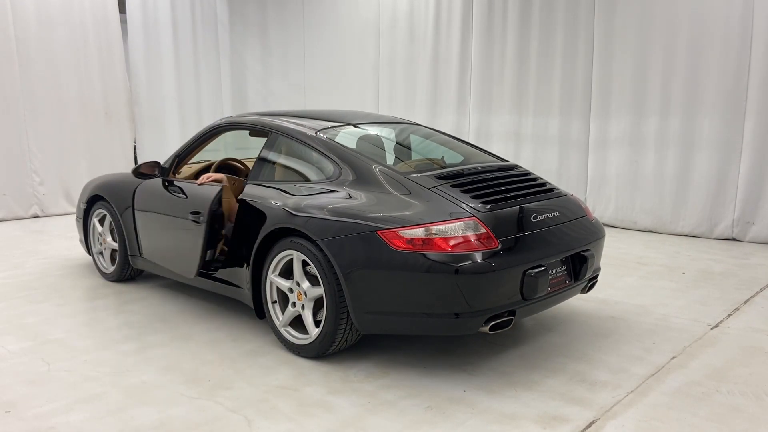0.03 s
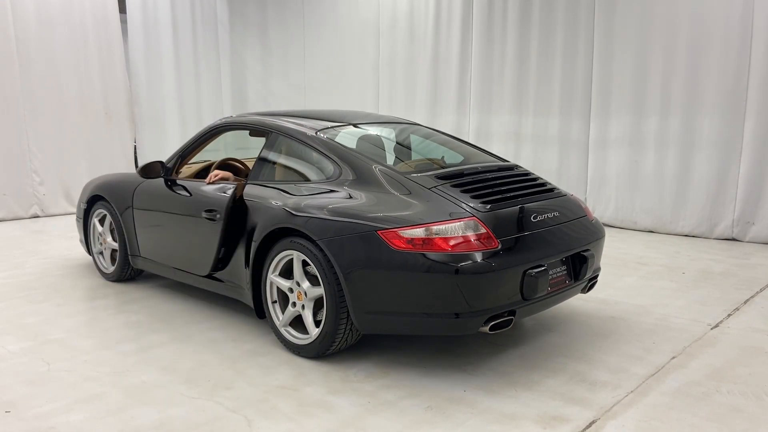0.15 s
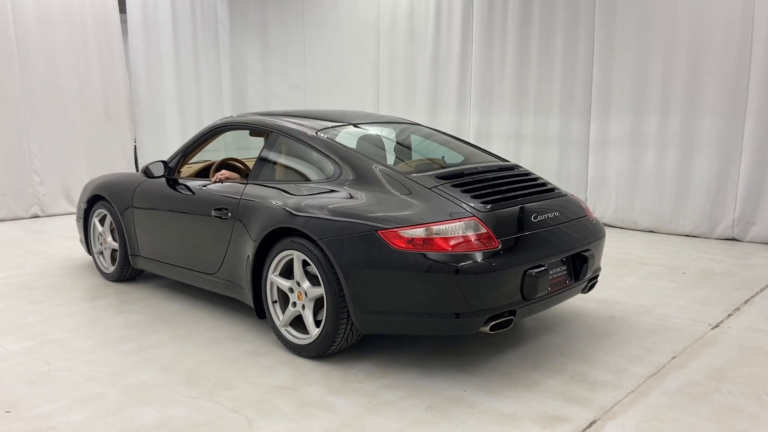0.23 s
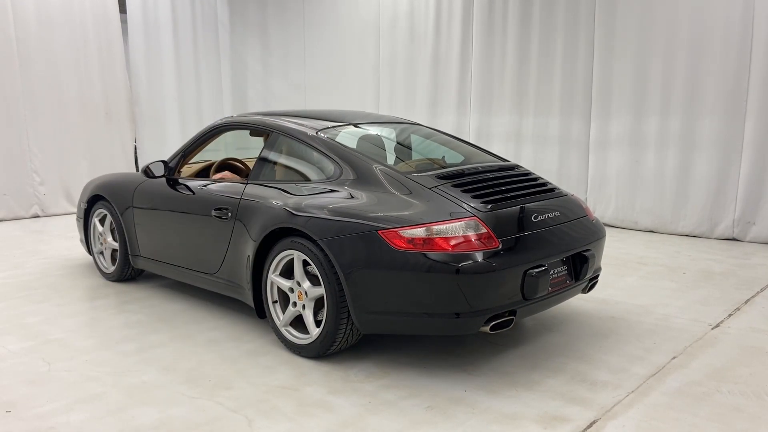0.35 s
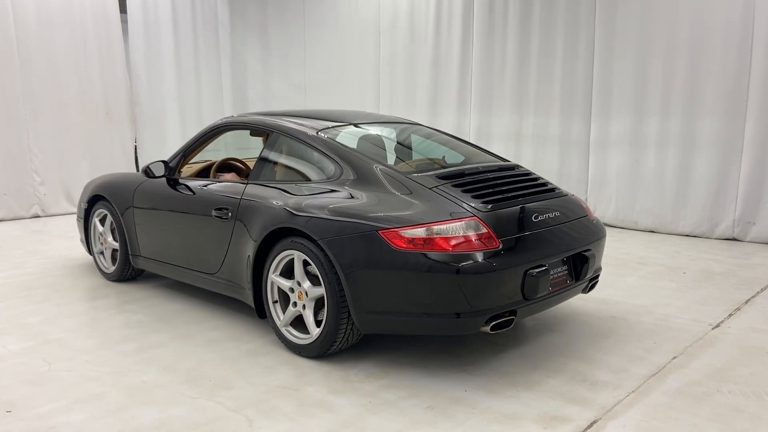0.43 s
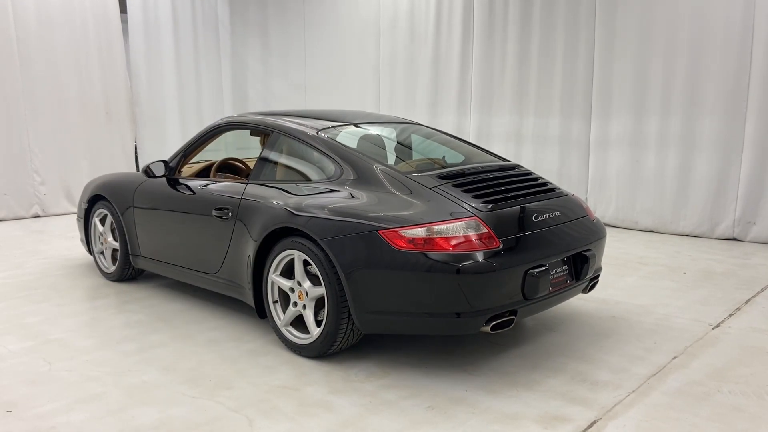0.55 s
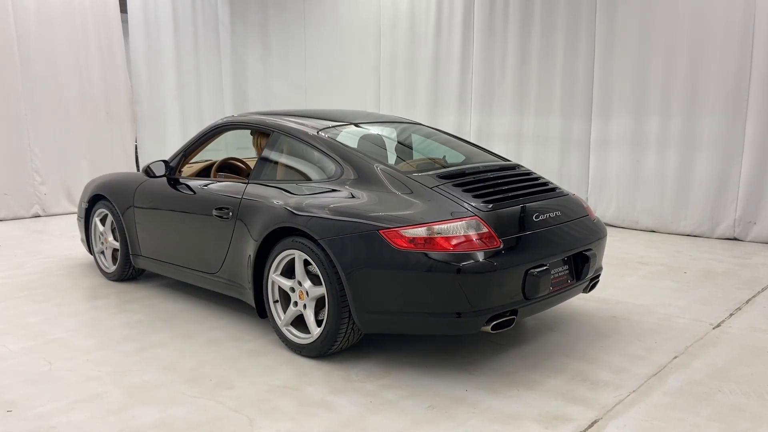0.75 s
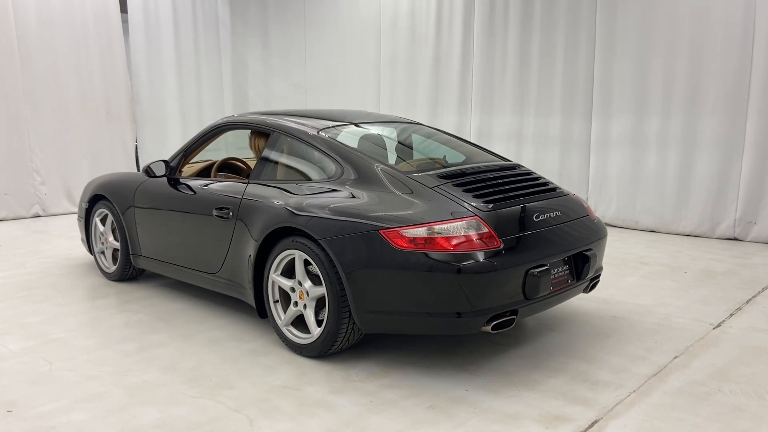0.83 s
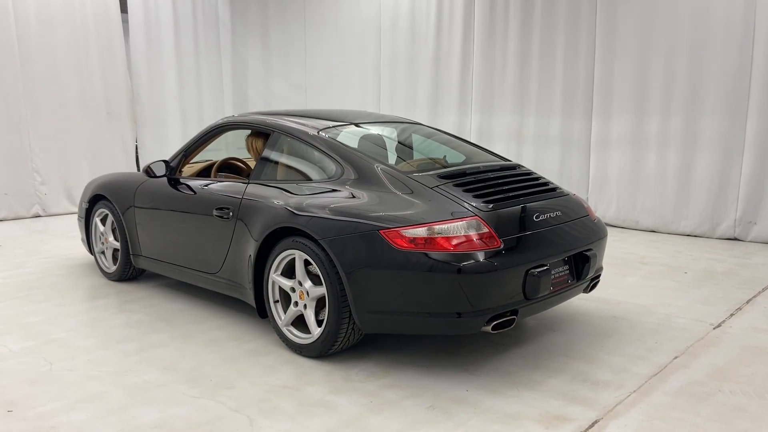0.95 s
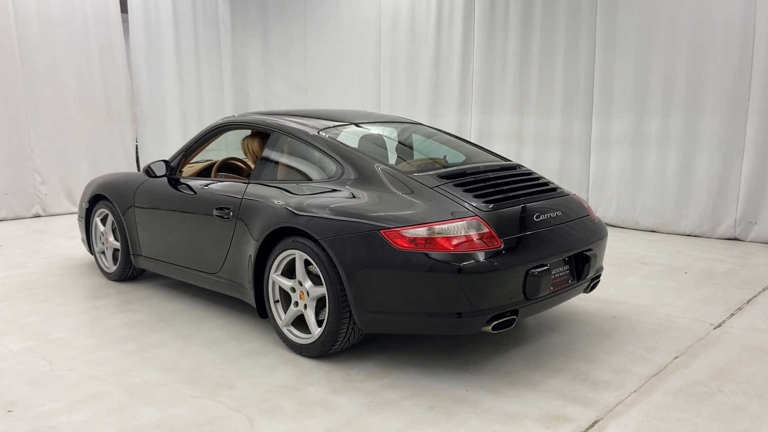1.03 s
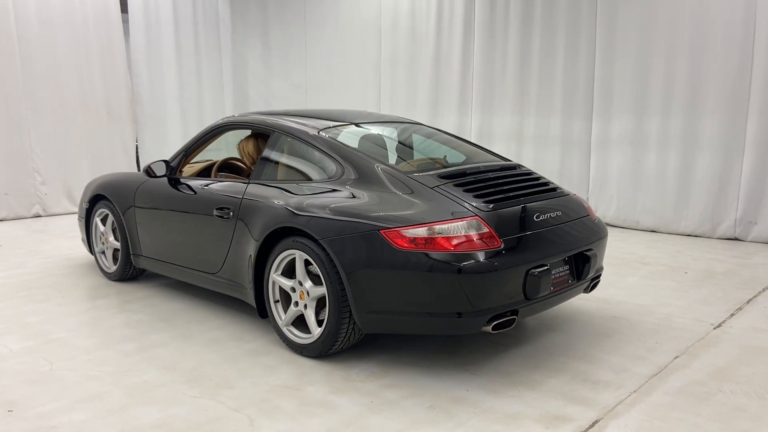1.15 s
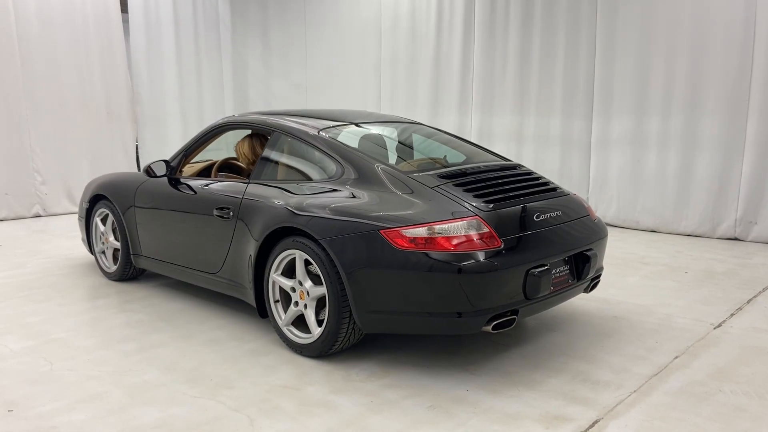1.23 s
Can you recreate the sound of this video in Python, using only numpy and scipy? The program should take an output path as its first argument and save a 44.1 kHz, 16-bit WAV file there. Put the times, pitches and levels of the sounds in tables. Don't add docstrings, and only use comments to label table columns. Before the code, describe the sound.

A car door slams once. Low ventilation hum and soft airy hiss run throughout. At about 0.23 seconds the latch touches and scrapes, then snaps hard at 0.28 with a heavy, deep thump near 0.29. Low swells and small rattles settle until about 0.5 seconds, with a short hall echo. The door is slightly left, a few metres from a phone; afterwards only the wavering hum remains.

```python
import sys
import numpy as np
from scipy import signal
from scipy.fft import rfft, irfft
from scipy.io import wavfile

SR = 44100
rng = np.random.default_rng(int(sys.argv[2]) if len(sys.argv) > 2 else 0)


def to_wav(sig):
    pcm = np.clip(np.atleast_2d(sig), -1, 1) * 32767
    pcm = np.round(pcm).astype(np.int16)
    wavfile.write(sys.argv[1], SR, pcm.T)


def field_ratio(decibels):
    return 10 ** (np.asarray(decibels, dtype=float) / 20)


N = 57330

# start in seconds, level in dB, rattle length in seconds,
# brightness in dB per octave, metal ring in dB.
LATCH_CONTACTS = [
    (0.229, -26.5, 0.0099, 2.4, -7),
    (0.2388, -25, 0.026, 1.5, -17.5),
    (0.278, -17, 0.0052, 2.5, -2),
    (0.2836, -23.5, 0.01, 3.5, -3.5),
    (.3010, -32.5, 0.02, -5.4, 1),
    (0.3255, -26.5, 0.017, 2, -8),
    (0.35, -34, 0.016, 0, -9.5),
    (0.365, -42.5, 0.024, 3.5, -5),
]
# pitch in Hz, level in dB, time to die by 60 dB in seconds.
LATCH_MODES = [(346, -2, 0.1), (444, -17, 0.013), (560, -17, 0.04), (745, -10, 0.008), (826, -1.5, 0.023),
               (970, -3, 0.0067), (1953, -9.5, 0.032), (2440, -12.5, 0.019), (2710, -4, 0.013),
               (4380, -12.5, 0.0077), (5230, -2.5, 0.0049), (6530, -18, 0.02), (6900, -29.5, .012)]
# frequency in Hz, level in dB per Hz.
SCRAPE_TONE = [(250, 1), (700, -0.4), (1050, -2.5), (1400, -13), (2200, -13.5), (3500, -22.5),
               (8000, -30.5), (16000, -42.5)]
# centre in seconds, peak in dB, pitch in Hz,
# ring time in seconds.
CLACKS = [(.2320, -33.5, 2280, 0.0022), (.2305, -39.5, 5600, 0.0009), (.2340, -37, 1200, 0.0012),
          (.2805, -14, 1936, 0.0017), (.2788, -20, 2850, 0.0009), (.2828, -20, 2520, 0.0012),
          (.2890, -28, 2570, .002), (.2930, -29, 1940, 0.0019), (.3310, -33.5, 2600, .003),
          (.2470, -38, 3600, .001), (.2520, -38, 4900, .0012), (.2580, -40, 5800, .001),
          (.3280, -38, 5200, .001), (.3330, -39, 4500, .0012), (.2330, -31, 620, .002),
          (.2795, -25, 1400, .0007), (.2805, -15.5, 860, 0.0013), (.2808, -30, 5450, 0.0019),
          (.2805, -36, 6400, .001), (.2890, -39, 6450, 0.0025), (.3300, -36, 1920, 0.003)]
# deepest inward swing in seconds, peak in dB, pitch in Hz,
# swell time in seconds.
BOOMS = [(.2350, -32.5, 196, 0.0072), (0.2507, -16, 189.6, 0.003), (.2670, -16.5, 122, 0.01),
         (0.2723, -24.5, 55, 0.01), (.2935, -7.5, 152, 0.0054), (0.3088, -11, 60.4, 0.011),
         (.3290, -17.5, 75, 0.0051), (.3080, -22, 201, 0.0063), (0.3420, -17.5, 138, 0.012),
         (.3430, -19, 87.5, 0.011), (.3580, -11.5, 82, 0.0082), (0.3648, -20, 145, .006),
         (0.419, -27.5, 68.2, 0.027), (.3780, -21, 186.6, 0.0065), (0.42, -26.5, 109.3, 0.045),
         (.4850, -26.5, 85, 0.016), (.5450, -30, 88.6, 0.012), (0.471, -34, 151, 0.018),
         (.4050, -26, 105, .008), (.4520, -29, 100, .012)]
# centre in seconds, peak in dB, pitch in Hz, swell time in seconds,
# lead of the left port in dB.
SKIN_RINGS = [(.242, -29, 333, 0.0088, 3), (.245, -35, 680, 0.0064, 6), (.2936, -18, 420, .0011, 3.5),
              (0.2896, -22.5, 685, 0.007, 7.5), (.305, -30.5, 1003, 0.011, 4),
              (.310, -32, 600, 0.0077, 5.5), (.329, -25, 820, 0.0026, 9.5), (.350, -32, 448, 0.028, 4),
              (.345, -33.5, 840, 0.0089, 11.5), (.361, -32, 900, 0.0029, 5), (.355, -31, 224, .02, 1),
              (0.35, -37, 720, .005, 5), (.325, -32.5, 339, .012, -4), (.400, -33.5, 303, .008, 1.5),
              (0.47, -35, 248, 0.0099, -5)]
# start in seconds, level in dB, length in seconds.
TICKS = [
    (.2405, -50, .003),
    (.2495, -50, .003),
    (.2725, -57, .002),
    (0.2755, -41, .002),
    (0.279, -31.5, 0.011),
    (0.322, -47, 0.016),
]
# frequency in Hz, time to die by 60 dB in seconds.
HALL_T60 = [(60, 1), (250, 0.63), (1000, 0.32), (4000, 0.46), (12000, 0.13)]
# frequency in Hz, level in dB per Hz.
AIR_TONE = [(59, -40.5), (100, -6.5), (109, -10.5), (202, -14.5), (535, -31), (570, -32), (801, -30.5),
            (4670, -53), (16000, -70)]
# frequency in Hz, left-right likeness (1 is identical).
AIR_ALIKE = [(60, 0.68), (130, 0.99), (290, 0.59), (640, 0.1), (1400, 0.38), (3100, 0.1), (7000, 0.51),
             (15000, 0.19)]
# pitch in Hz, level in dB, wobble width in Hz, dB gained per dB of fan load.
FAN_TONES = [(85.25, -35, 1.2, 1), (162.5, -43.5, 4.11, -1.1), (196.2, -48.5, 1.14, 0.26),
             (129, -45, 6.22, -0.02), (824, -63.5, 10, 0.56), (240.6, -52.5, 5, 0.1)]
# time in seconds, load in dB.
FAN_LOAD = [(0, 3), (.1, -4.5), (.2, -2.5), (.55, -2.5), (.7, 5.5), (1.0, 2), (1.15, 2), (1.3, -3.5)]
# centre in Hz, width in Hz, depth in dB.
SUM_GAPS = [(8980, 420, -22), (13150, 520, -22), (15000, 900, -4.5)]

RATTLE_PER_S, RATTLE_SCATTER_DB = 4000, 2.2
SCRAPE_DB, LATCH_LOW_HZ, LATCH_SIDE_DB = 2, 300, -5
KNOCK_S, KNOCK_DB, KNOCK_WIDTH_S = .2900, -12, .00025
SKIN_LAG_S, CLACK_LAG_S = 0.00062, 0.00013
TICK_LOW_HZ = 9500
HALL_DB, HALL_BASS_DB, RING_IN_HALL_DB = -6, -19, -7
HALL_GAP_S, HALL_ALIKE_HZ = .004, 230
AIR_DB, AIR_FLICKER_DB, AIR_LEFT_DB = -49, 0.98, 2.5
RUMBLE_HZ, RUMBLE_WIDTH_HZ, RUMBLE_DB = 50.7, 13, -43.5
LEFT_DB, LEFT_LAG_S = 3, .00023
DEEP_LEFT_DB, DEEP_HZ = 2, 89
PORTS_HZ, IN_STEP_HZ, COMB_HZ, PORTS_ALIKE = 5600, 6900, 4120, .985
TREBLE_LEFT_DB, TREBLE_RIGHT_DB = -3, -3
TOP_HZ, FADE_S = 15750, .004
LEFT_RIGHT = np.array([[1], [-1]])


def latch(t):
    clicks = (rng.random((2, N)) < RATTLE_PER_S / SR) * np.sign(rng.standard_normal((2, N)))
    clicks = clicks * field_ratio(RATTLE_SCATTER_DB * rng.exponential(size=(2, N)))

    def metal(x):
        return sum(field_ratio(db) * ring(x, hz, t60) for hz, db, t60 in LATCH_MODES)

    scale = 1 / np.std(metal(clicks))
    grit = clicks + np.std(clicks) * rng.standard_normal((2, N))
    scrape = level(shape(grit, lambda f: field_ratio(along(SCRAPE_TONE, f))), SCRAPE_DB)
    out = 0
    for s, db, length, tilt_db, ring_db in LATCH_CONTACTS:
        u = np.maximum(t - s, 0) / length
        env = (1 - np.exp(-u * 9)) * np.exp(-u ** 2)
        rings = field_ratio(ring_db) * scale * metal(clicks * env)
        hit = field_ratio(db) * np.array([rings, scrape * env])

        def brightness(f):
            tilt = field_ratio(tilt_db * np.log2(np.maximum(f, 100) / 1500))
            return tilt * f ** 4 / (f ** 4 + LATCH_LOW_HZ ** 4)

        out = out + shape(hit, brightness)
    return out


def booms(t):
    knock = field_ratio(KNOCK_DB) * np.exp(-.5 * ((t - KNOCK_S) / KNOCK_WIDTH_S) ** 2)
    return knock + swells(t, BOOMS)


def swells(t, table):
    out = 0
    for s, db, hz, swell in table:
        env = np.exp(-.5 * ((t - s) / swell) ** 2)
        out = out - field_ratio(db) * env * np.cos(2 * np.pi * hz * (t - s))
    return out


def clacks(t):
    return np.array([swells(t, CLACKS), swells(t - CLACK_LAG_S, CLACKS)])


def skin(t):
    lag = np.array([[0], [SKIN_LAG_S]])
    return sum(lean(left_db) * swells(t - lag, [row]) for *row, left_db in SKIN_RINGS)


def ticks(t):
    hiss = shape(rng.standard_normal(N), lambda f: 1 / (1 + (TICK_LOW_HZ / (f + 1)) ** 6))
    env = 0
    for s, db, length in TICKS:
        env = env + field_ratio(db) * (t > s) * np.exp(-(np.maximum(t - s, 0) / length) ** 2)
    return hiss * env


def hall(x, t):
    reply = 0
    for hz in 60 * 2. ** np.arange(9):
        band = shape(rng.standard_normal((2, N)), lambda f: np.exp(-2 * np.log2(np.maximum(f, 1) / hz) ** 2))
        reply = reply + band * field_ratio(-60 * t / along(HALL_T60, hz))
    reply = reply * (t > HALL_GAP_S)
    reply = reply / np.sqrt(np.mean(np.sum(reply ** 2, axis=1)))
    wet = signal.fftconvolve(x[None], reply, axes=1)[:, :N]
    return wet - shape(wet - wet[0], lambda f: 1 / (1 + (f / HALL_ALIKE_HZ) ** 4))


def air(t):
    hiss = 0
    for hz in 100 * 2 ** np.arange(0, 7.4, .5):
        alike = np.clip(along(AIR_ALIKE, hz), -.99, .99)

        def band(f):
            return field_ratio(along(AIR_TONE, f)) * np.exp(-8 * np.log2(np.maximum(f, 1) / hz) ** 2)

        mid, side = shape(rng.standard_normal((2, N)), band)
        both = np.sqrt(1 + alike) * mid + np.sqrt(1 - alike) * side * LEFT_RIGHT
        hiss = hiss + field_ratio(AIR_FLICKER_DB * walk(5.7)) * both
    hiss = hiss * field_ratio(AIR_DB) / np.std(shape(hiss.mean(axis=0), lambda f: f > 250))
    low = level(shape(rng.standard_normal(N), bell(RUMBLE_HZ, RUMBLE_WIDTH_HZ / 2)), RUMBLE_DB)
    load_db = np.interp(t, *np.array(FAN_LOAD).T)
    for hz, db, width_hz, share in FAN_TONES:
        phase = 2 * np.pi * np.cumsum(hz + width_hz * walk(20)) / SR
        tone_db = db + share * load_db + 0.62 * walk(7.3)
        low = low + np.sqrt(2) * field_ratio(tone_db) * np.sin(phase)
    left, right = (hiss + low) * lean(AIR_LEFT_DB)
    return np.array([np.interp(t - LEFT_LAG_S, t, left), right])


def level(x, db):
    return x * field_ratio(db) / np.sqrt(np.mean(x ** 2))


def lean(db):
    return field_ratio(db * LEFT_RIGHT / 2)


def along(table, hz):
    a = np.array(table)
    return np.interp(np.log(np.maximum(hz, 1)), np.log(a[:, 0]), a[:, 1])


def shape(x, gain):
    n = x.shape[-1]
    return irfft(rfft(x) * gain(np.fft.rfftfreq(n, 1 / SR)), n)


def bell(hz, width_hz):
    return lambda f: np.exp(-.5 * ((f - hz) / width_hz) ** 2)


def ring(x, hz, t60):
    p = np.exp(2j * np.pi * hz / SR - np.log(1000) / (t60 * SR))
    return signal.lfilter([1], [1, -p], x + 0j).imag


def walk(rate_hz):
    return level(shape(rng.standard_normal(N), bell(0, rate_hz)), 0)


def ports(left, right):
    def share(f):
        return PORTS_ALIKE / (1 + (PORTS_HZ / (f + 1)) ** 12)

    def leak_gain(f):
        return field_ratio(TREBLE_RIGHT_DB) * share(f) * np.exp(2j * np.pi * (f - IN_STEP_HZ) / COMB_HZ)

    leak = shape(left, leak_gain)
    left = shape(left, lambda f: field_ratio(TREBLE_LEFT_DB * share(f)))
    right = leak + shape(right, lambda f: np.sqrt(1 - share(f) ** 2))
    mid = shape(left + right, lambda f: field_ratio(sum(db * bell(hz, w)(f) for hz, w, db in SUM_GAPS)))
    return np.array([mid + left - right, mid - left + right]) / 2


def scene():
    t = np.arange(N) / SR
    rings, scrape = latch(t)
    low, clack = booms(t), clacks(t)
    mid, side = rings + scrape
    bright = field_ratio(RING_IN_HALL_DB) * (rings[0] + clack[0]) + scrape[0]
    wet = hall(field_ratio(HALL_DB) * bright + field_ratio(HALL_BASS_DB) * low, t)
    deep = shape(low, lambda f: field_ratio(DEEP_LEFT_DB * LEFT_RIGHT / 2 / (1 + (f / DEEP_HZ) ** 4)))
    door = clack + skin(t) + mid + field_ratio(LATCH_SIDE_DB) * side * LEFT_RIGHT + deep + wet
    return door * lean(LEFT_DB) + air(t) + ticks(t)


def band_limit(x):
    return signal.sosfilt(signal.butter(12, 16780, fs=SR, output="sos"), x)


def record(dry):
    def edges(f):
        bass_cut = 1 / np.sqrt(1 + (38 / (f + 1)) ** 4)
        return bass_cut / (1 + np.exp(np.minimum((f - TOP_HZ) / 40, 50)))

    fade = np.sin(np.pi / 2 * np.minimum(np.arange(N)[::-1] / SR / FADE_S, 1)) ** 2
    margin = N // 10
    padded = np.pad(dry, ((0, 0), (margin, margin)), mode="reflect")
    heard = shape(ports(*padded), edges)[:, margin:-margin]
    return band_limit(heard * fade)


dry = scene()
out = record(dry)
to_wav(out)
```